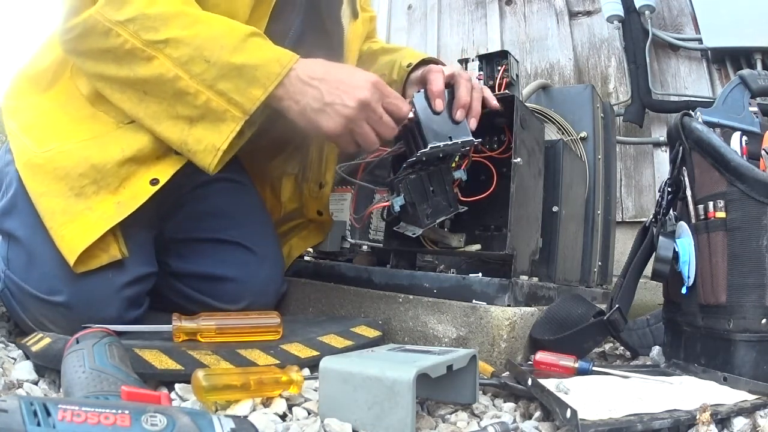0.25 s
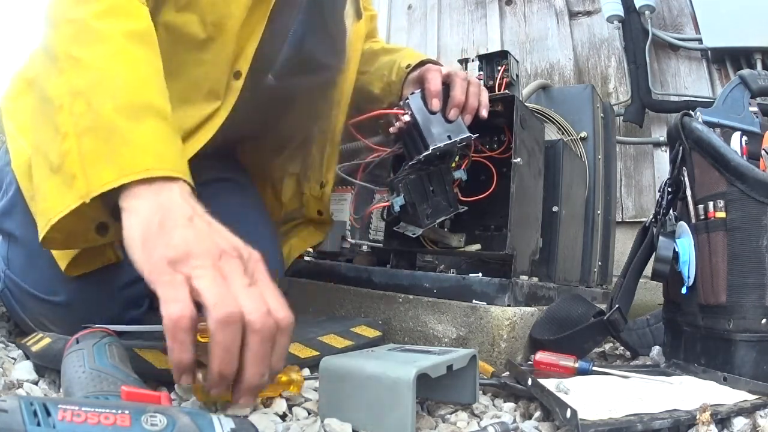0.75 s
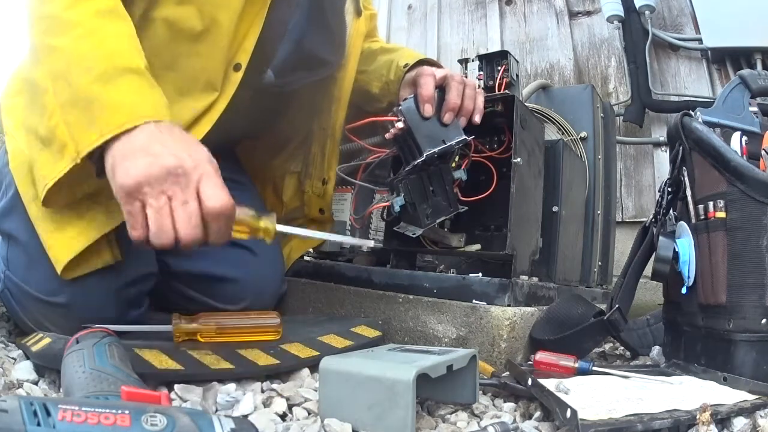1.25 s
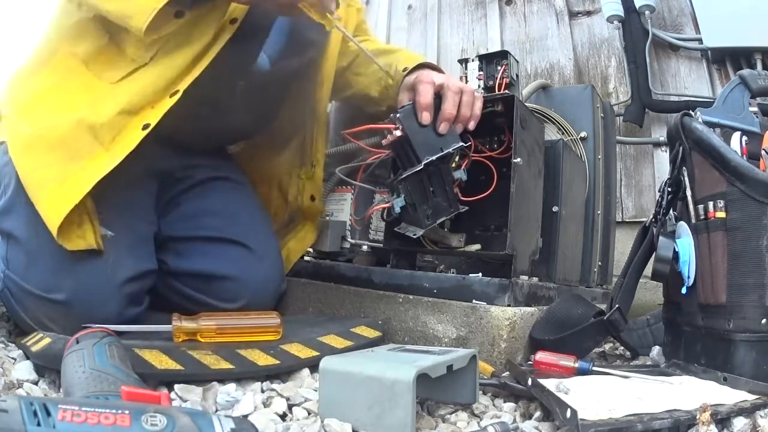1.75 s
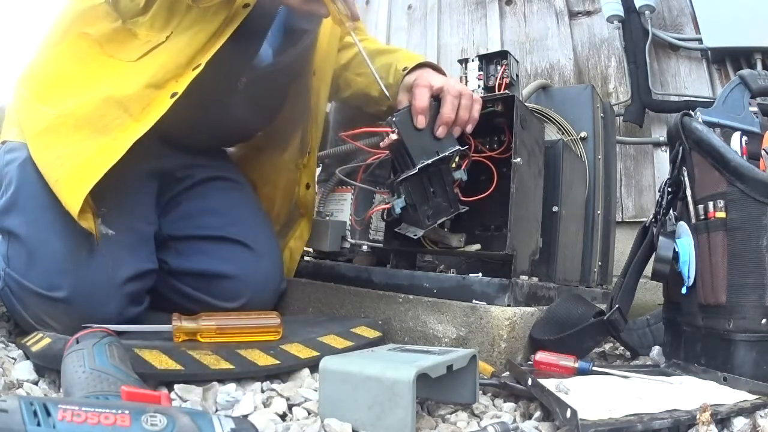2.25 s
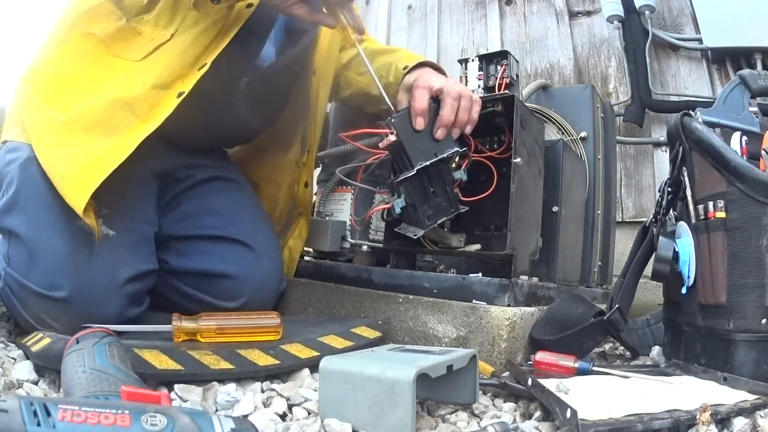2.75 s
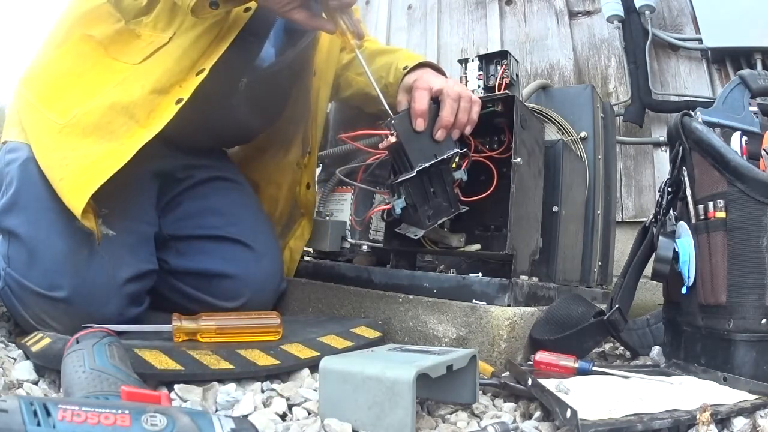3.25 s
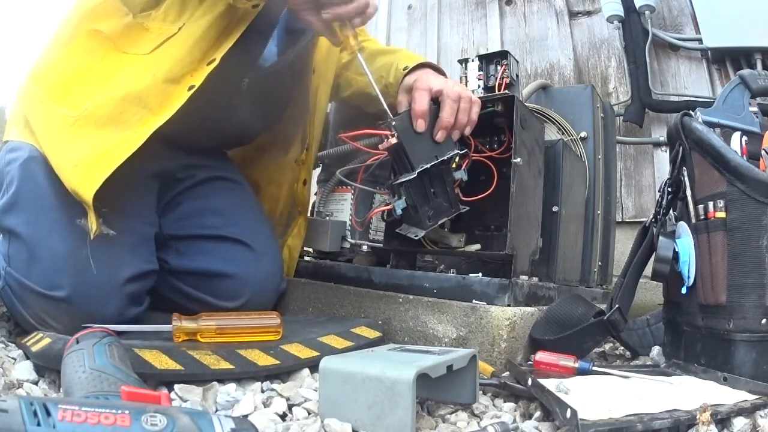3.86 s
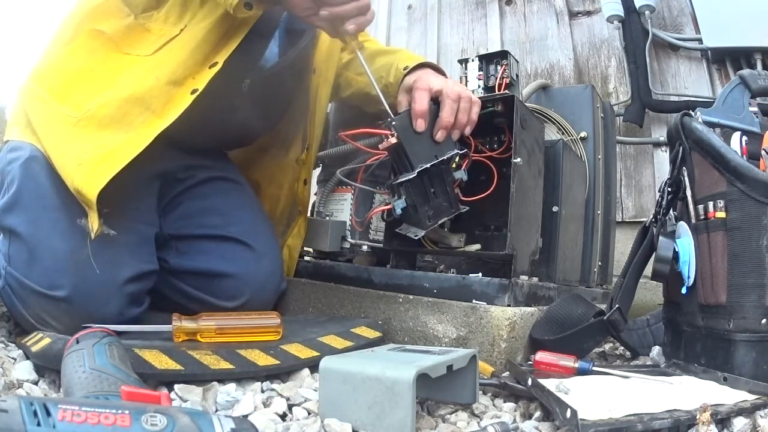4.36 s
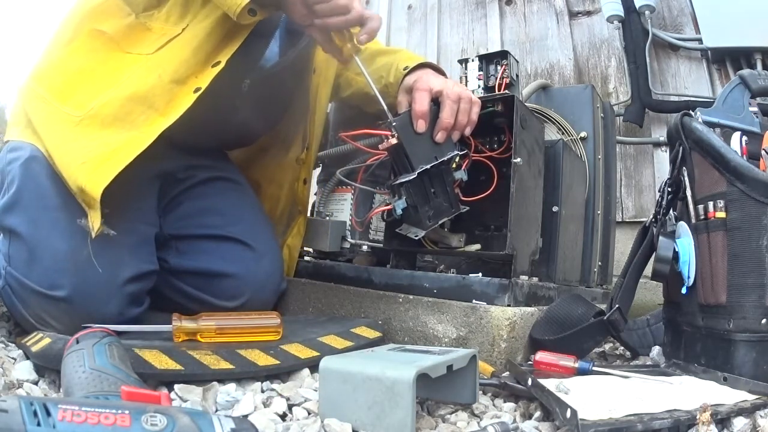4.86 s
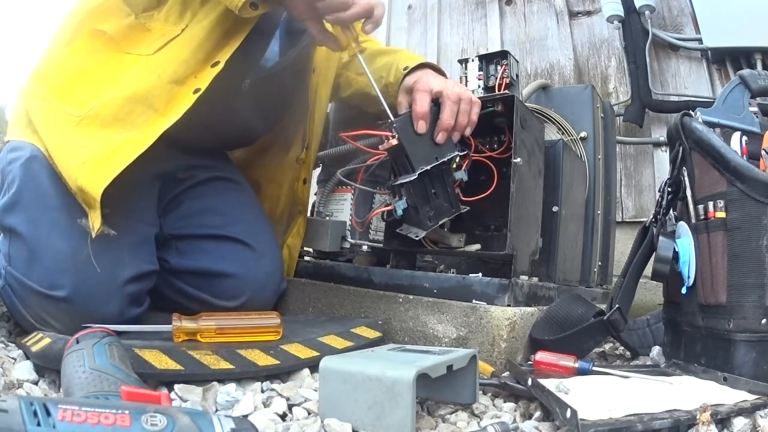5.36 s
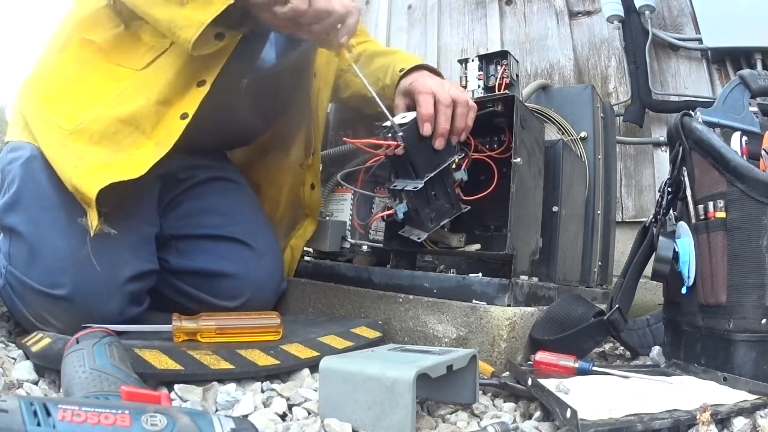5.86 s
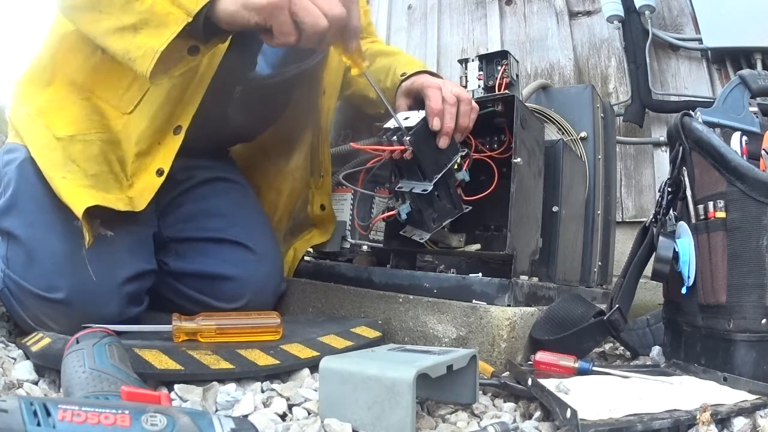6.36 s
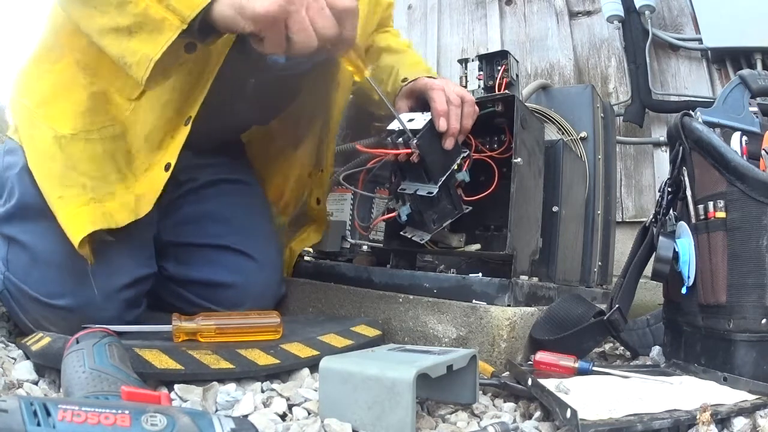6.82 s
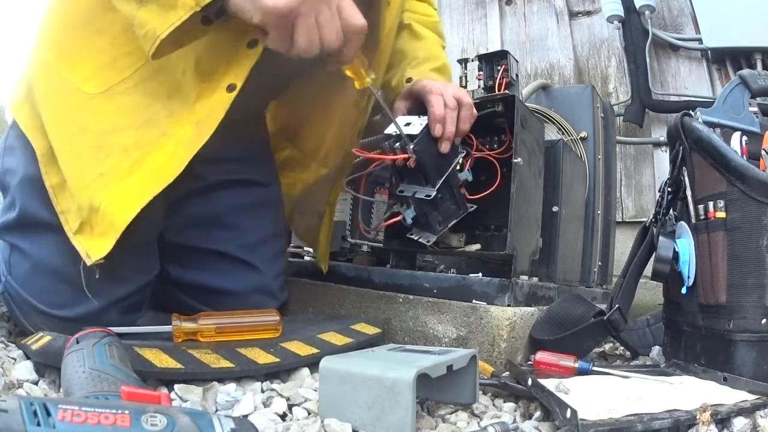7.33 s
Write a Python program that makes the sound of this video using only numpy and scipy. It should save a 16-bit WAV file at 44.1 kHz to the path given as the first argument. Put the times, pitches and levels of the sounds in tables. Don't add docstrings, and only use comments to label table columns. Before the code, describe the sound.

Steady buzzing compressor hum with gas hiss, sparse screwdriver clicks, and a late fan run-up swelling into a low, throbbing rush of air.

```python
import sys
import numpy as np
from scipy import signal
from scipy.fft import rfft, irfft, next_fast_len
from scipy.io import wavfile
from scipy.ndimage import uniform_filter1d, map_coordinates

SR = 44100
rng = np.random.default_rng(int(sys.argv[2]) if len(sys.argv) > 2 else 0)


def to_wav(sig):
    pcm = np.clip(np.atleast_2d(sig), -1, 1) * 32767
    pcm = np.round(pcm).astype(np.int16)
    wavfile.write(sys.argv[1], SR, pcm.T)


def boost(x):
    u = np.asarray(x, float) / 20
    return 10 ** u


N = 334719
TIME = np.arange(N) / SR
EARLY_BLADE_HZ, LATE_BLADE_HZ = 30, 62


def unit(x):
    return x / np.sqrt(np.mean(x ** 2) + 1e-20)


def along(points, hz):
    f, v = np.transpose(points)
    return np.interp(np.log(hz + 1), np.log(f + 1), v)


def curve(rows, t=TIME):
    return np.interp(t, *np.transpose(rows))


def bumps(peaks, hz):
    return sum(db * np.exp(-2 * ((hz - c) / w) ** 2) for c, w, db in peaks)


def wobble(rate_hz):
    return map_coordinates(rng.standard_normal(int(N * rate_hz / SR) + 4), [TIME * rate_hz])


def filtered(x, response):
    m = next_fast_len(x.shape[-1] + 8192)
    spectrum = rfft(x, m) * response(np.fft.rfftfreq(m, 1 / SR))
    return irfft(spectrum, m)[..., :x.shape[-1]]


def rush(gain, patchy_db):
    z = signal.stft(rng.standard_normal((2, N)), nperseg=512)[2]
    field = uniform_filter1d(rng.standard_normal(z.shape[1:]), size=6, axis=0)
    field = uniform_filter1d(field, size=8, axis=1)
    patchy = signal.istft(z * boost(patchy_db * unit(field)), nperseg=512)[1][:, :N]
    return unit(filtered(patchy, gain))


# f/Hz, level/dB
LEFT_GAIN = [(40, 4), (100, 7), (200, 6), (400, 0.5), (700, -7), (1100, -5), (1500, -15.5), (2400, -4),
             (4200, -9), (7000, -4), (10500, 2.5)]
# f/Hz, phase/rad
LEFT_LEAD = [(30, -1.5), (90, 1.4), (200, -.5), (600, -1.5), (1200, -2), (2300, -2), (3200, -4.5),
             (4200, -4.5), (7000, -5), (10500, -5.5)]
# f/Hz, coherence/0-1
COHERENCE = [(40, .6), (70, 0.96), (300, 0.62), (800, 1), (1500, 0.5), (4000, 0.36), (10000, 1)]


def ports(near, other):
    like = lambda hz: np.clip(along(COHERENCE, hz), 0, 1)
    left = lambda hz: boost(along(LEFT_GAIN, hz)) * np.exp(1j * along(LEFT_LEAD, hz))
    shared = filtered(near, lambda hz: left(hz) * like(hz))
    own = filtered(other, lambda hz: left(hz) * np.sqrt(1 - like(hz) ** 2))
    return np.array([shared + own, near])


# t/s, rate/Hz
SHAFT = [(0, 58.808), (1.2, 58.803), (2.8, 58.791), (4.2, 58.782), (7.59, 58.777)]
# f/Hz, level/dB
WEAK_ORDERS = [(50, -65), (600, -59), (1500, -74), (3000, -64), (3330, -64), (3400, -82), (3500, -78),
               (3710, -88), (3770, -64.5), (4500, -67.5), (5300, -60), (7000, -67), (9700, -61.5),
               (11000, -65)]
# order, level/dB fan at rest, level/dB fan at speed
SUCTION_ORDERS = [(2, -44.5, -54), (4, -23.8, -30), (5, -46, -52), (6, -35, -41), (8, -33, -31),
                  (10, -41, -45), (12, -41, -45), (13, -42.5, -51), (14, -36.5, -40), (15, -36, -38),
                  (16, -43.5, -50), (17, -38, -42), (18, -40, -43), (20, -36.5, -38), (22, -46.5, -50),
                  (24, -37, -40), (25, -45.5, -45), (26, -39, -43), (27, -40, -36), (28, -39, -34),
                  (29, -50.5, -47), (30, -45.5, -48)]
# order, level/dB fan at rest, level/dB fan at speed
VALVE_ORDERS = [(32, -47.5, -53), (33, -41.5, -49), (34, -46, -50), (37, -42.5, -43), (39, -51, -49),
                (40, -44.5, -46), (41, -45, -38), (43, -43, -44.5), (44, -50, -58), (45, -52, -48.5),
                (46, -50.5, -44), (48, -53, -61), (49, -56.5, -53), (51, -56.5, -61), (52, -49, -46.5),
                (53, -49.5, -49.5), (54, -48.5, -47.5), (55, -50, -54), (56, -53.5, -61), (57, -59.5, -61),
                (60, -40, -57), (61, -40.5, -40), (62, -50.5, -52)]
# order, level/dB fan at rest, level/dB fan at speed
WHISTLE_ORDERS = [(71, -56, -57), (74, -55.5, -60), (85, -55.5, -53), (86, -52, -57), (87, -52, -53.5),
                  (88, -51.5, -64), (90, -48, -48), (96, -57, -43.5), (102, -55, -61), (105, -52.5, -59),
                  (111, -54, -56), (122, -61.5, -54), (127, -70, -55), (153, -56, -61), (160, -69, -55),
                  (164, -61, -54.5), (166, -59, -59), (183, -60, -59)]
# f/Hz, level/dB
SHELL_SIDE = [(118, 7.5), (235, 5.5), (470, -1.5), (850, -7.5), (1100, -5), (1430, -19), (1800, -9),
              (9000, -3)]
# f/Hz, width/Hz, level/dB
PASSING_RING = [(1410, 60, -6.5), (1555, 130, 5.5)]


def compressor(scatter_db=4.5, wander_db=1.3, flicker_db=2.6, flicker_rad=.35, jitter_turns=.0003):
    knot_s = .06
    order, knots = np.arange(1, 189), np.arange(0, N / SR + .2, knot_s)
    hz = order * SHAFT[2][1]
    right_db = along(WEAK_ORDERS, hz) + scatter_db * rng.standard_normal((2, len(order)))
    side_scatter_db = np.minimum(order / 30, 1) * rng.standard_normal(len(order))
    side_db = along(SHELL_SIDE, hz) + side_scatter_db
    rows = np.array(SUCTION_ORDERS + VALVE_ORDERS + WHISTLE_ORDERS)
    strong = rows[:, 0].astype(int) - 1
    right_db[:, strong] = rows[:, 1:].T

    early, late = shift(knots, EARLY_BLADE_HZ), shift(knots, LATE_BLADE_HZ)
    moved = np.where(order < 31, late[:, None], early[:, None])
    db = right_db[0] + moved * (right_db[1] - right_db[0])
    db = db + np.outer(early - late, bumps(PASSING_RING, hz))

    restless = order / (order + 40.0)
    chance = restless * rng.standard_normal((3, len(knots), len(order)))
    wander = uniform_filter1d(chance[0], size=16, axis=0) * np.sqrt(16)
    db = db + wander_db * wander + flicker_db * chance[1]

    loose = ((order > 8) & (abs(order - 26) > 2)) | (order % 2 == 1)
    start_rad = np.where(loose, rng.uniform(-np.pi, np.pi, len(order)), np.pi)
    near = boost(db) * np.exp(1j * (start_rad + flicker_rad * chance[2]))
    left = near * boost(side_db) * np.exp(1j * along(LEFT_LEAD, hz))
    size = 4096
    lines = np.pad(np.array([left, near]), ((0, 0), (0, 0), (1, 0)))
    turn = irfft(lines, size) * size / np.sqrt(2)
    turn = np.concatenate([turn, turn[..., :1]], axis=2)
    angle = (np.cumsum(curve(SHAFT)) / SR + jitter_turns * wobble(25)) % 1 * size
    return np.array([map_coordinates(ear, [TIME / knot_s, angle], order=1) for ear in turn])


# f/Hz, density/dB per Hz
HISS = [(20, -24), (50, -20), (70, -9.5), (150, -8), (400, -4), (900, -3.5), (1300, -7.5), (2000, -11.5),
        (2800, -12), (4200, -13.5), (6500, -19.5), (8000, -21.5), (11000, -43)]
# f/Hz, width/Hz, level/dB
HISS_RESONANCES = [(229.5, 34, 8.5), (639, 110, 5), (950, 65, 0.5), (1560, 240, 6.5), (1940, 83, 4), (2374, 200, 7),
                   (3230, 160, 0), (3410, 68, -12), (3597, 150, 8.5), (3747, 110, -3), (4480, 1000, -4),
                   (5100, 360, 5), (9750, 1130, 13.5)]


def gas():
    pair = rush(lambda hz: boost(along(HISS, hz) + bumps(HISS_RESONANCES, hz)), patchy_db=2.5)
    pulse = 1 + 0.072 * np.sin(2 * np.pi * np.cumsum(curve(SHAFT)) / SR)
    rise_db = 1.45 * shift(TIME, EARLY_BLADE_HZ)
    level_db = -29.5 + rise_db + 0.24 * wobble(2.82)
    return boost(level_db) * pulse * ports(*pair)


# t/s, blade rate/Hz
FAN = [
    (0, 0),
    (4.4, 10),
    (5.0, 26),
    (5.4, 40),
    (5.9, 57),
    (6.4, 71.5),
    (6.8, 78.5),
    (7.2, 80),
    (7.59, 80.8),
]


def shift(t, start_hz):
    span_hz = 17
    return np.clip((curve(FAN, t) - start_hz) / span_hz, 0, 1)


# multiple, level/dB at full speed
BLADE = [(1, -26.5), (2, -34), (3, -22), (4, -53), (5, -35.5)]
# f/Hz, density/dB per Hz
ROAR = [(20, -24), (60, -38), (120, -15), (250, -6.5), (400, -5.5), (600, 0), (800, -5), (1100, -13),
        (1600, -23), (2400, -26.5), (4000, -30), (7000, -43.5), (11000, -42)]


def fan():
    full_hz = FAN[-1][1]
    rate_hz = curve(FAN) * (1 + 0.00574 * wobble(4))
    angle = 2 * np.pi * np.cumsum(rate_hz) / SR
    tones = sum(boost(db + 1.5 * wobble(4.6)) * np.sqrt(2) * np.sin(k * angle) for k, db in BLADE)
    tones = tones * (rate_hz / full_hz) ** 6.1
    to_right = lambda hz: boost(-along(LEFT_GAIN, hz)) * np.exp(-1j * along(LEFT_LEAD, hz))
    right_tones = filtered(tones, to_right)

    roar = rush(lambda hz: boost(along(ROAR, hz)), patchy_db=1.0)
    full_db, idle_db, growth = -17.5, -37.5, 2.92
    level = boost(full_db) * (curve(FAN) / full_hz) ** growth + boost(idle_db)
    surge_s, surge_width_s, surge_db = 6.45, 0.24, 1
    surge = surge_db * np.exp(-((TIME - surge_s) / surge_width_s) ** 2)
    lumps = boost(2.2 + .3 * wobble(9) + surge)
    fade_in = np.clip((TIME - 3.9) / 0.8, 0, 1)
    return level * lumps * fade_in * ports(*roar) + np.array([tones, right_tones])


# f/Hz, width/Hz, level/dB
BRIGHT_COLOUR = [(5150, 1050, 7.5), (6800, 1700, 9), (9430, 2800, 8)]


def tool_body(hz):
    low = np.exp(-(np.log((hz + 1) / 800) / 0.57) ** 2)
    return low + 0.23 * np.exp(-(np.log((hz + 1) / 2500) / 0.52) ** 2)


def tool_treble(hz):
    return (boost(bumps(BRIGHT_COLOUR, hz)) + 0.8 * (hz < 4600)) / (1 + (1700 / (hz + 1)) ** 4)


# t/s, peak/dB
TICKS = [(0.0633, -20.5), (0.1141, -23), (0.8969, -18), (0.9014, -25), (0.9404, -23), (0.9462, -17),
         (1.0281, -19), (1.048, -6), (1.106, -23), (1.1463, -26), (1.2794, -26), (3.0324, -24),
         (3.3764, -28), (5.4494, -23), (6.7544, -26), (6.9995, -18)]
# t/s, peak/dB
TAPS = [
    (1.0555, -10.5),
    (1.5875, -16.5),
    (1.592, -25),
    (1.6034, -25),
    (1.6064, -26),
    (1.6174, -25),
    (7.0174, -21),
    (7.0234, -21),
]
# t/s, peak/dB, f/Hz
PINGS = [
    (3.829, -28, 4200),
    (4.6075, -25, 4080),
    (4.993, -36, 4150),
    (7.031, -33, 4900),
    (1.0545, -19, 5250),
]


def tool_contacts():
    out, t = np.zeros((2, N + SR)), np.arange(SR // 10) / SR
    # f/Hz, t60/s, spread/log pitch
    hits = [row + (6200, .0095, .95) for row in TICKS]
    hits += [row + (5000, .012, .7) for row in TAPS]
    hits += [row + (.02, .035) for row in PINGS]
    pan_db = -1.5 * np.array([[.5], [-.5]])
    for s, db, centre_hz, t60_s, spread in hits:
        def colour(hz):
            peak = np.exp(-(np.log((hz + 1) / centre_hz) / spread) ** 2) * boost(bumps(BRIGHT_COLOUR, hz))
            return peak + boost(-13) * spread * tool_treble(hz) + boost(1) * spread * tool_body(hz / 3)

        noise = rng.standard_normal((3, len(t)))
        crack = filtered(noise[0] + .4 * noise[1:], colour)
        crack = crack * boost(-60 * (t / t60_s) ** 1.6) * (1 - np.exp(-t / .0002))
        out[:, round(s * SR):][:, :len(t)] += boost(db + pan_db) * crack / np.abs(crack).max()
    return out[:, :N]


# t/s, length/s, treble/dB, body/dB
SCUFFS = [
    (.85, .03, -42, -60),
    (4.195, .01, -38, -60),
    (4.2035, .02, -24.5, -23),
    (4.225, .014, -35, -24),
    (4.236, .018, -38, -29),
    (1.59, .03, -34, -60),
    (4.609, .004, -25, -38),
    (7.016, .022, -33, -29),
]


def tool_slips():
    out, t = np.zeros((2, N + SR)), np.arange(SR // 10) / SR
    for s, length_s, treble_db, body_db in SCUFFS:
        noise = rng.standard_normal((4, len(t)))
        grit = boost(1.8 * np.repeat(rng.standard_normal(len(t) // 90), 90))
        shape = np.exp(-(t / length_s) ** 2) * (1 - np.exp(-t / 0.00021)) * grit
        scratch = boost(treble_db) * unit(filtered(noise[0] + 0.19 * noise[1:3], tool_treble))
        thud = boost(body_db) * unit(filtered(noise[3], tool_body))
        out[:, round(s * SR):][:, :len(t)] += shape * (scratch + thud) * boost([[-2], [2]])
    return out[:, :N]


def mains():
    hum_hz, left_db, right_db, start_rad = 120.12, -43.2, -50.2, 1.13
    return boost([[left_db], [right_db]]) * np.sqrt(2) * np.sin(2 * np.pi * hum_hz * TIME + start_rad)


def scene():
    return compressor() + gas() + fan() + tool_contacts() + tool_slips() + mains()


def top_cut(x):
    return signal.sosfilt(signal.butter(12, 12010, fs=SR, output="sos"), x)


def record(dry):
    top_hz, slope_hz = 11130, 150
    mix = filtered(dry, lambda hz: np.clip((top_hz - hz) / slope_hz, 0, 1))
    return top_cut(mix)


dry = scene()
out = record(dry)
to_wav(out)
```